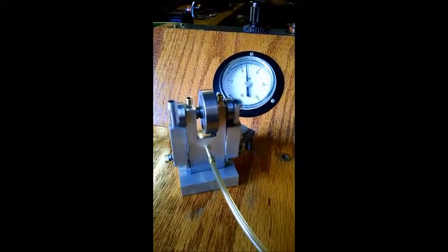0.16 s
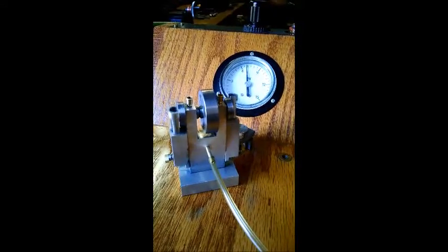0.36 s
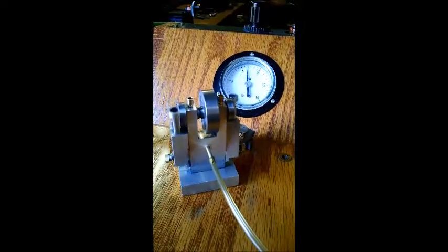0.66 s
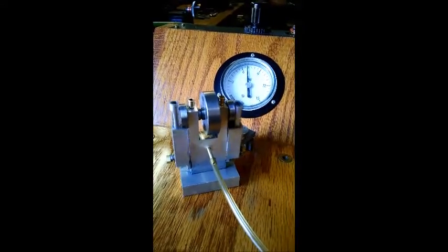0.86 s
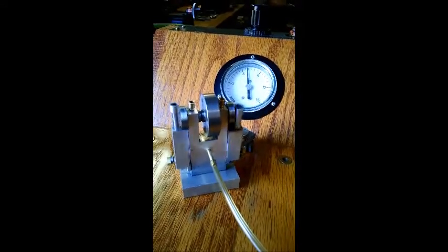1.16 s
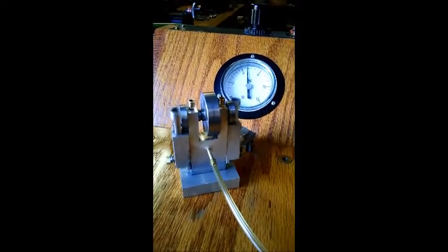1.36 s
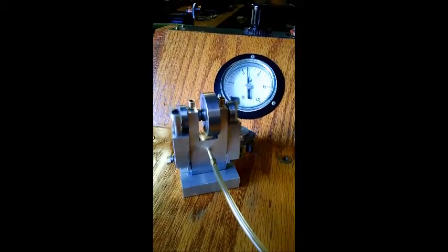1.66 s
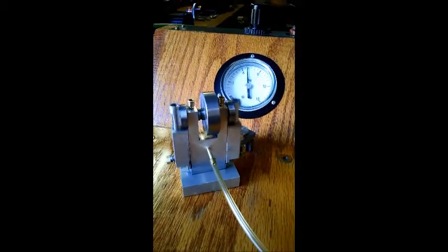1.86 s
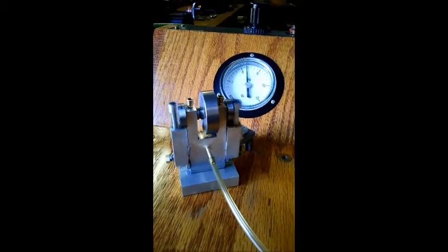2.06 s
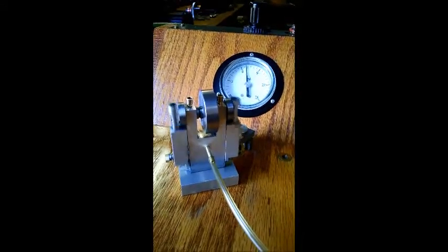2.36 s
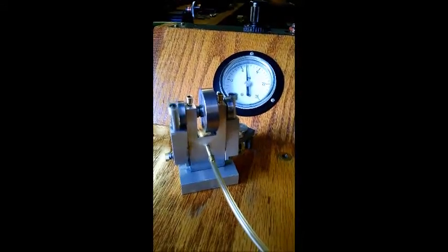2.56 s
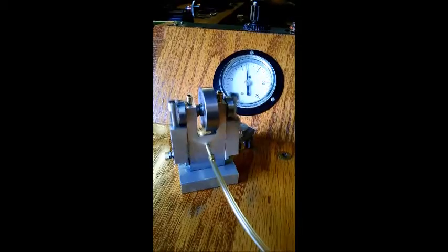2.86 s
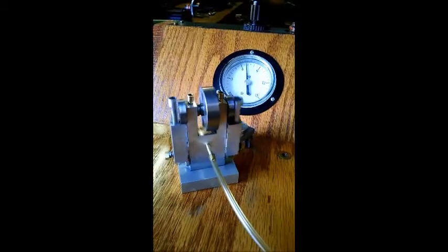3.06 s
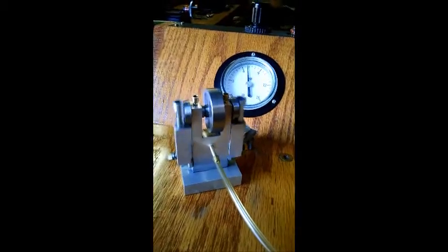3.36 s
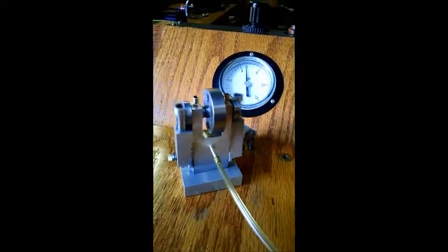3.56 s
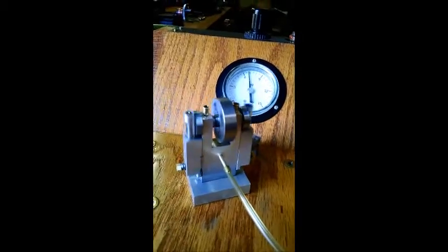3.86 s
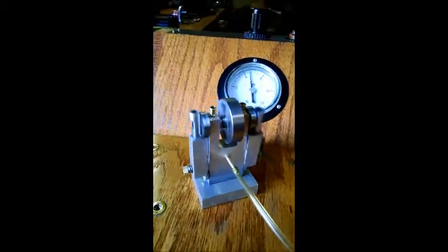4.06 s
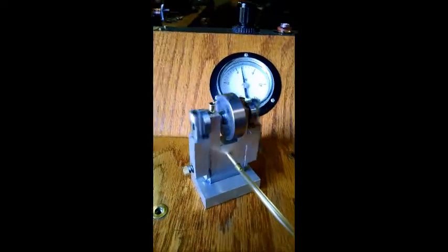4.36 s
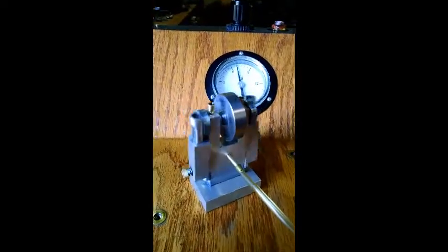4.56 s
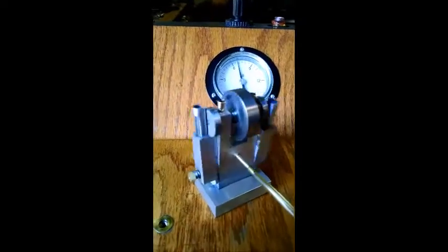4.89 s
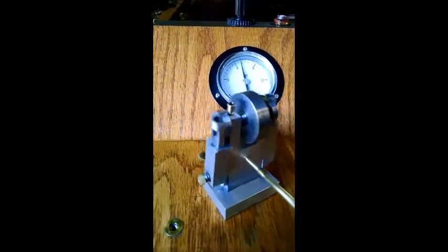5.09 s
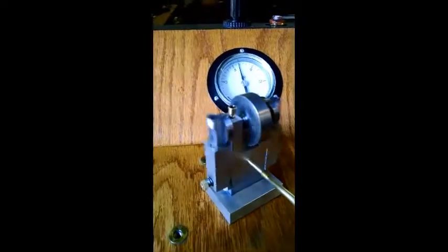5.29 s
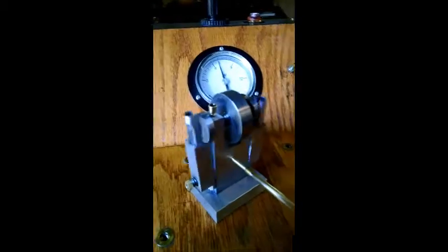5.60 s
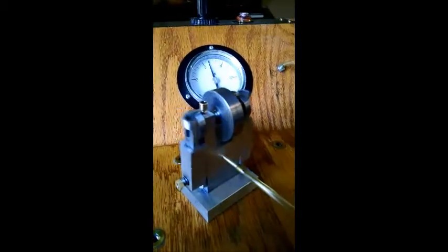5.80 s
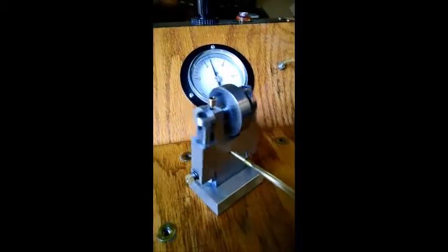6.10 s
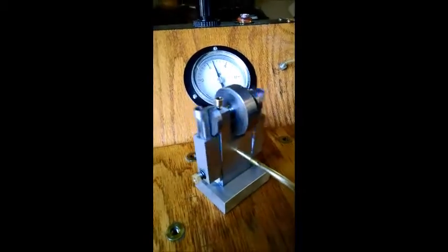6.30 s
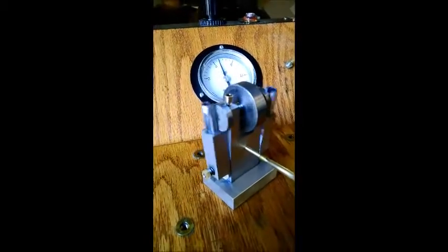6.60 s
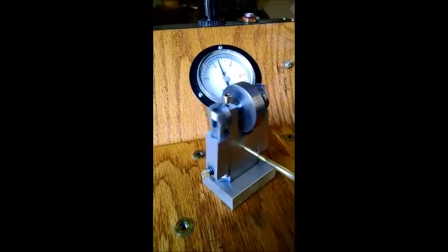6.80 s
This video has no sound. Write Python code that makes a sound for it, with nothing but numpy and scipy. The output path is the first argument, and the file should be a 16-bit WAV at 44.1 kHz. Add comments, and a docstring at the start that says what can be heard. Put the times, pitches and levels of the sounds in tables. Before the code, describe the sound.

A small compressed-air engine runs steadily on a wooden stand, about seven turns a second. Each turn gives two crisp puffs of bright, hissing air with a short spit, while the linkage knocks and thumps against metal and board. A thin airy leak fills the gaps. The handheld microphone moves closer midway, making the hiss brighter and the leak stronger; soft handling rustles come late over faint indoor room noise.

```python
"""A small compressed-air engine puffs at seven turns a second on a wooden stand, close to a hand-held phone.
Each turn lets out two main puffs of air, made of shaped noise: a broad hiss, a shrill jet and a short spit.
The linkage takes up its play with knocks and thumps, short blows that set the frame and board ringing.
Air leaks at the valve, most strongly between the puffs, as a band of noise that slides in pitch.
The phone moves closer in the second half; soft rustles, clicks, room noise and a faint hum lie below."""
import sys
import numpy as np
from scipy import signal
from scipy.fft import rfft, irfft
from scipy.io import wavfile
from scipy.ndimage import uniform_filter1d

SR = 44100
rng = np.random.default_rng(int(sys.argv[2]) if len(sys.argv) > 2 else 0)


def wav_out(sig):
    """Save sig, one row per channel (or a flat mono array), as 16-bit PCM at SR to the path in sys.argv[1]."""
    wavfile.write(sys.argv[1], SR, np.round(np.clip(np.atleast_2d(sig).T, -1, 1) * 32767).astype(np.int16))


N = 306054
TIME = np.arange(N) / SR  # s
FREQ = np.maximum(np.fft.rfftfreq(N, 1 / SR), 1)  # Hz

# no two turns let out the same air
# (port cracks open t/s, main puff relative level/dB, second puff relative level/dB, spit relative level/dB)
TURN_STRENGTHS = [(0.12, 2.0, 1.5, -3), (0.265, 2.5, 1.0, -3), (0.413, 0.5, 1.0, -5), (0.561, 1.0, 1.5, 0),
                  (0.705, 0.5, 1.0, -1), (0.85, 0.0, 1.0, -7), (0.991, 1.5, 0.5, -1),
                  (1.142, -1.0, 0.0, -9), (1.289, -1.0, -1.5, -3), (1.432, -1.5, -1.0, -2),
                  (1.579, -1.5, -1.5, -2), (1.723, 0.5, -1.5, 0), (1.869, -0.5, -1.5, -4),
                  (2.014, -0.5, -0.5, -9), (2.157, -0.5, -1.0, -5), (2.301, 0.5, 0.0, -2),
                  (2.441, 0.5, 0.0, -10), (2.59, -1.0, -1.0, -7), (2.734, -2.0, -0.5, -3),
                  (2.877, 1.0, -2.0, -4), (3.019, -0.5, -1.5, -2), (3.165, -1.0, -1.0, -3),
                  (3.305, -2.0, -1.5, 1), (3.446, -2.0, -1.0, -2), (3.589, -1.5, -1.0, 2),
                  (3.728, -2.0, 1.5, 0), (3.875, -1.0, 0.5, -1), (4.018, 0.5, 2.5, -3),
                  (4.158, -0.5, 2.5, -2), (4.298, -1.0, 0.0, -2), (4.443, -1.5, -0.5, -2),
                  (4.585, -0.5, -0.5, 2), (4.728, 1.0, 0.0, -1), (4.871, -1.0, -1.5, 4),
                  (5.013, -0.5, -2.0, -1), (5.156, 1.0, 0.0, 6), (5.3, -1.0, -0.5, 4), (5.441, 0.5, 0.5, 7),
                  (5.582, -1.0, 0.5, 6), (5.723, 0.0, -1.0, 2), (5.863, -1.0, -0.5, -5),
                  (6.008, 0.5, 2.5, 2), (6.149, 1.0, 1.0, 6), (6.293, 0.5, 1.0, 3), (6.436, -1.0, -0.5, -2),
                  (6.578, -0.5, -0.5, 2), (6.718, 0.0, -0.5, 4), (6.862, 0.5, -1.0, -11)]


def exhaust(angle, near, jet_hz, linger_s=0.018, linger_db=-13):
    """Each port opening lets out a puff; the shrill jet grows faster with the flow than the broad hiss."""
    # air let out during a turn: (crank angle/degrees, relative level/dB, opening/degrees, closing/degrees)
    openings = [(-58, -16, 4, 4.7), (-1, 1.5, 14.3, 17.5), (86, -4, 31.6, 23.2), (115, -15, 4, 3),
                (151.5, -15, 15, 9.6)]
    # broad hiss: (f/Hz, relative level per Hz from afar/dB, relative level per Hz from near/dB)
    hiss_colour = [(680, -18.5, -2), (1520, -18, -13.5), (2480, -15, -4.5), (3130, -11, -10),
                   (3530, -18, -4.5), (4280, -4, -7.5), (5200, 3, -2), (6400, 1.5, 1), (7720, 4, 8),
                   (10150, -3, 3), (11600, -2.5, -9), (15800, 0, 5)]
    # shrill jet: (f/Hz, relative level per Hz from afar/dB, relative level per Hz from near/dB)
    jet_colour = [(2960, -23, -17.5), (4250, -35, -26.5), (5120, -10.5, 3), (6400, -18, -37),
                  (10100, -12.5, 0.5), (12600, -6, -18), (13170, 0, -1.5), (14100, 6, 7), (14500, -2.5, -2),
                  (16000, 11, 8), (17000, -0.5, -3)]

    power = 0
    strength = pressure()
    for degrees, db, opening, closing in openings:
        since = (angle - degrees + 180) % 360 - 180  # degrees, wrapped to the nearest opening
        puff = undb(db) * strength * swell(since, opening, closing)
        power = power + puff ** 2
    # turbulence makes the outflow flutter within each puff
    flutter = unit(uniform_filter1d(rng.standard_normal(N), size=110))
    power = power * undb(1 * flutter) ** 2  # 1 dB rms
    # the room holds each puff for a moment
    keep = np.exp(-1 / (linger_s * SR))
    lingering = signal.lfilter([1 - keep], [1, -keep], power)
    flow = np.sqrt(power + undb(linger_db) ** 2 * lingering)

    hiss_noise = beamed(hiss_colour, near, ripple(depth_db=1.8, span_s=0.0053))
    hiss = undb(-28.0) * flow ** 0.51 * hiss_noise
    jet_noise = beamed(jet_colour, near, ripple(depth_db=1.8, span_s=0.007))
    jet = undb(-22.0) * flow ** 1.05 * jet_noise
    # only the shrill top of the jet changes pitch with the angle to the phone
    shrill = irfft(rfft(jet) * (FREQ > 12000), N)
    # nearer its axis, where it sounds highest, the jet's upper hiss also fills the gaps
    spray_noise = air_noise(np.exp(-((FREQ - 12500) / 2500) ** 2))
    spray = undb(-42.0) * jet_hz / 350 * spray_noise
    # on the axis the shrill top is louder too
    top = glide(shrill, jet_hz) * undb(4.7 * jet_hz / 350)
    return hiss + jet - shrill + top + spray


def pressure(second_puff_s=0.04):
    """Strength of the air behind each stroke, passing from one puff to the next."""
    s, main_db, second_db, _ = np.transpose(TURN_STRENGTHS)
    times = np.c_[s, s + second_puff_s].ravel()
    levels_db = np.c_[main_db, second_db].ravel()
    return undb(np.interp(TIME, times, levels_db))


def swell(x, rise, fall):
    """A puff-like bump: round-topped at x = 0, with flanks that become exponential."""
    return np.exp(.5 - np.sqrt(0.17 + (x / np.where(x < 0, rise, fall)) ** 2))


def ripple(depth_db, span_s):
    """Echoes from the stand comb a spectrum with fixed narrow peaks and dips."""
    size = max(int(span_s * SR), 8)
    echoes = rng.standard_normal(size) * np.linspace(0, 1, size)
    return undb(depth_db * unit(rfft(echoes, N).real))


def beamed(table, near, comb):
    """Noise whose colour passes from the far to the near spectrum as the phone moves."""
    hz, *spectra = np.transpose(table)
    far, close = (air_noise(comb * undb(over_freq(np.transpose([hz, db])))) for db in spectra)
    near = np.clip(near, 0, 1)
    return np.sqrt(1 - near) * far + np.sqrt(near) * close


def glide(x, offset_hz):
    """Slide a band of noise up or down by a changing number of Hz."""
    turning = np.exp(2j * np.pi * np.cumsum(offset_hz) / SR)
    return (signal.hilbert(x) * turning).real


def air_noise(gain, direct=1):
    """Coloured noise at both ports: the left is delayed and partly unrelated, more so the less direct it is."""
    # how far the left microphone port lags the right: (f/Hz, lag/radians)
    port_lag = [(130, -2.8), (230, -.4), (1500, 0), (2000, .5), (2330, 3.08), (2680, 3.2), (3000, 4.3),
                (3500, 6.2), (4200, 6.3), (4500, 9.35), (5250, 9.5), (6000, 10.5), (7000, 12.9),
                (7700, 16.5), (9300, 19), (10150, 21.9), (10700, 22.4), (11400, 24.5), (12600, 26.6),
                (13100, 29.5), (14200, 31.4), (15200, 35.4)]
    # likeness of direct air noise at the two ports: (f/Hz, likeness/0-1)
    likeness = [(300, 0.64), (1500, .9), (2200, 0.7), (2400, .98), (2530, 1), (2680, .97), (3050, 0.45),
                (3800, 0.9), (4300, .5), (4650, .995), (5250, 0.995), (5900, 0.45), (8000, .35),
                (8900, 0.8), (9700, .7), (10300, 0.96), (11200, 0.45), (11900, .75), (12750, .25),
                (13900, .87), (14750, .5), (15300, 0.7)]
    right, other = rfft(rng.standard_normal((2, N)))
    alike = np.clip(over_freq(likeness) * direct, 0, 1)
    lagged = right * np.exp(-1j * over_freq(port_lag))
    left = alike * lagged + np.sqrt(1 - alike ** 2) * other
    return unit(irfft(np.array([left, right]) * gain, N))


def spit(rise_s=0.0016, fall_s=0.0026, centre_hz=5500, octaves=0.33):
    """The exhaust port cracks open with a short, sharp spit of noise, only partly alike at the two ports."""
    t = np.arange(-SR // 100, SR // 40) / SR
    envelope = np.zeros(N)
    for when, _, _, db in TURN_STRENGTHS:
        add(envelope, when + t[0], undb(db) * swell(t, rise_s, fall_s))
    band = 1 / (1 + (np.log2(FREQ / centre_hz) / octaves) ** 2)
    return undb(-38.5) * envelope * air_noise(band, direct=0.65)


def leak(angle, leak_db, leak_hz, width_hz=520, depth=0.95, swing_hz=110):
    """Air seeps all the time, and sings in a narrow gap while the valve is shut, rising as pressure builds."""
    # steady seepage: (f/Hz, relative level per Hz/dB)
    seep_colour = [(300, 6), (1000, -1), (2200, 4), (3200, 11), (3700, 3), (4400, 2), (5100, -8),
                   (6200, -9), (8000, -28), (10000, 14.5), (11500, 8.5), (12700, -5), (14200, 13),
                   (16000, 10)]
    shut = 1 + depth * np.cos(np.radians(angle - 245))
    centre = np.mean(leak_hz)
    pitch = leak_hz + swing_hz * np.cos(np.radians(angle - 320))
    band = air_noise(1 / (1 + ((FREQ - centre) / (2 * width_hz)) ** 2) ** 3)
    singing = undb(-46.5 + leak_db) * shut * glide(band, pitch - centre)
    seep = undb(-41.0 + 0.22 * leak_db) * air_noise(undb(over_freq(seep_colour)))
    return singing + seep


def linkage(angle, near, jitter_s=0.00019):
    """Light knocks repeat with the crank; the loosest joint thumps once a turn, followed by a click."""
    # play taken up during a turn: (crank angle/degrees, relative level/dB, strongest f/Hz, breadth/octaves,
    # push time/s, scatter of level/dB, level gained up close/dB)
    knock_table = [(-100, -16.5, 400, 1.6, 0.0054, 4, -3), (-57.5, -8, 490, 0.76, 0.003, 1.5, 0),
                   (-56, -5, 1138, 0.84, 0.0035, 0.9, 3), (-42, -1, 408, 0.87, 0.0064, 0.5, 2.5),
                   (-17, -12, 447, 0.83, 0.01, 3, 2), (0.5, -5, 1353, 0.55, 0.0071, 1.5, 0),
                   (1.5, -14, 1886, 0.13, 0.0089, -1, 1), (74, -6.5, 1138, 1.1, 0.0043, 2.2, -2.5),
                   (77, -9.5, 360, 0.34, 0.0056, 2.5, -1)]
    # return-stroke thumps, harder or softer as the play drifts: (t/s, relative level/dB)
    thump_table = [(0.0217, -1.5), (0.1691, -4.5), (0.3166, -1.5), (0.4631, 0), (0.609, 1.5), (0.757, -2),
                   (0.9023, 0), (1.046, 1.5), (1.1925, -2), (1.3393, -2), (1.484, -6), (1.6293, 1.5),
                   (1.7741, -2), (1.917, -4), (2.0636, -4.5), (2.2061, -3.5), (2.3514, -9), (2.496, -2),
                   (2.6408, -1), (2.7839, 0.5), (2.927, 0), (3.0712, 0.5), (3.2138, 3), (3.356, -0.5),
                   (3.4988, 2), (3.6408, -0.5), (3.7815, -3), (3.925, 0), (4.0666, 1), (4.208, -0.5),
                   (4.35, -12), (4.4928, -2), (4.6363, -1.5), (4.777, -4.5), (4.923, 2), (5.0643, 3),
                   (5.2055, 0.5), (5.3492, 2), (5.491, 5.5), (5.6339, 4.5), (5.774, 3), (5.915, 3),
                   (6.0574, 4.5), (6.201, 4), (6.3427, 0.5), (6.4853, 3.5), (6.6255, 4), (6.769, 0),
                   (6.9112, 3.5)]

    out = np.zeros(N)
    for degrees, db, blow_hz, octaves, push_s, scatter_db, near_db in knock_table:
        for when in passes(angle, degrees):
            late, strength = rng.standard_normal(2)
            level_db = db + scatter_db * strength + near_db * np.interp(when, TIME, near)
            add(out, when + jitter_s * late, undb(level_db) * blow(blow_hz, octaves, push_s))
    for when, db in thump_table:
        thump = blow(blow_hz=381, octaves=0.83, push_s=0.0051)
        add(out, when, undb(3 + db) * thump)
        click = blow(blow_hz=1262, octaves=0.82, push_s=0.0059)
        add(out, when + 0.00224, undb(-12 + 0.17 * db) * click)
    # the heavy frame radiates little treble, and less above the bass towards the phone's nearer position
    body = rfft(out) / (1 + (FREQ / 2200) ** 24)
    bass = body / (1 + (FREQ / 650) ** 4)
    upper = irfft(body - bass, N) * undb(-3.8 * near)
    right = undb(-37.5) * (irfft(bass, N) + upper)
    # the left port picks up less of the board's bass, and a little sooner
    left_db = over_freq([(200, -19.5), (330, -4.0), (450, -0.5), (580, -6.0), (800, 2.5), (2000, -0.5)])
    lead = over_freq([(150, 0.086), (450, 0.99), (1000, 0.2), (1500, 0.68), (2000, -1.1)])  # radians
    left = irfft(rfft(right) * undb(left_db) * np.exp(1j * lead), N)
    return np.array([left, right])


def blow(blow_hz, octaves, push_s, push_db=7, crack_db=-13, contact_s=0.00086):
    """One blow shoves the stand for a moment, then the modes in its range ring on."""
    # ringing of the board (low) and engine frame (high): (f/Hz, relative level/dB, time to fall 60 dB/s)
    ringing_modes = [(196, -23, 0.5), (239.5, -7.5, 0.56), (322.6, -4.5, 0.19), (345.5, -4.5, 0.08),
                     (416.6, -1, 0.073), (439, -1.5, 0.13), (518.5, -4, 0.08), (592, 3.5, 0.02),
                     (798, 6, 0.037), (954.5, 6.5, 0.036), (1037, 8, 0.03), (1257, 5.5, 0.036),
                     (1350, 4, 0.053), (1890, -2.5, 0.054)]
    hz, mode_db, t60 = np.transpose(ringing_modes)
    t = np.arange(SR // 3) / SR
    rings = np.sin(2 * np.pi * hz[:, None] * t) * np.exp(-np.log(1000) * t / t60[:, None])
    # from blow to blow the modes differ by about 1 dB
    scatter_db = 1 * rng.standard_normal(len(hz))
    in_range = 1 / (1 + (np.log2(hz / blow_hz) / octaves) ** 2)
    weight = undb(mode_db + scatter_db) * in_range
    push = undb(push_db) * np.sin(2 * np.pi * blow_hz * t) * np.sin(np.pi * np.minimum(t / push_s, 1))
    crack = undb(crack_db) * rng.standard_normal(len(t)) * np.exp(-t / 0.0022)
    # the oil film softens the first contact
    return push + (weight @ rings + crack) * (1 - np.exp(-t / contact_s))


def crank(start_turns=-0.8):
    """Crank angle in degrees, about zero at the main puff: the running sum of the flywheel's speed."""
    # flywheel speed, wandering with the air supply: (t/s, speed/turns per s)
    flywheel_speed = [(0.0, 6.839), (0.5, 6.763), (0.8, 6.915), (1.1, 6.863), (2.65, 6.954), (4.0, 7.062),
                      (4.9, 6.965), (5.2, 7.061), (6.94, 7.022)]
    speed = np.interp(TIME, *np.transpose(flywheel_speed))
    return 360 * (start_turns + np.cumsum(speed) / SR)


def passes(angle, degrees):
    """The times at which the crank passes a given angle, once a turn."""
    marks = degrees + 360 * np.arange(-1, angle[-1] // 360 + 2)
    inside = (marks > angle[0]) & (marks < angle[-1])
    return np.interp(marks[inside], angle, TIME)


def room(x, wet_db, t60_s, low_hz=420):
    """A short diffuse tail, different at each port; the bass is left to the board's own ringing."""
    t = np.arange(SR // 2) / SR
    tail = rng.standard_normal((2, len(t))) * np.exp(-np.log(1000) * t / t60_s) * (t > .004)
    tail /= np.sqrt(np.sum(tail ** 2, axis=1, keepdims=True))
    tail = signal.sosfilt(signal.butter(2, low_hz, "high", fs=SR, output="sos"), tail)
    return x + undb(wet_db) * signal.fftconvolve(x, tail, axes=1)[:, :N]


def handling():
    """Soft rustles of grainy noise, and stray clicks that are fast-fading tones."""
    # brief rustles: (t/s, level/dB, rise/s, fall/s)
    rustle_table = [(5.262, -35.5, 0.0096, 0.018), (5.815, -40, 0.016, 0.019), (6.048, -30.5, 0.044, 0.05)]
    # their colour: (f/Hz, relative level per Hz/dB)
    rustle_colour = [(200, -21), (600, -5.5), (1800, -4.5), (3000, -6), (4300, -3), (5200, -2), (7000, -3),
                     (10000, -2.5), (12000, -2.5), (16000, -27)]
    # stray clicks: (t/s, level/dB, f/Hz, decay/s)
    click_table = [(.152, -20, 716, 0.001), (1.828, -30, 440, 0.0046), (5.26, -34, 1400, .003),
                   (5.283, -34, 545, .007)]
    envelope = sum(undb(db) * swell(TIME - s, rise, fall) for s, db, rise, fall in rustle_table)
    grain = unit(uniform_filter1d(rng.standard_normal(N), size=150))
    noise = air_noise(undb(over_freq(rustle_colour)), direct=0.84)
    out = envelope * undb(1.5 * grain) * noise  # grain of 1.5 dB rms
    for s, db, hz, decay in click_table:
        t = np.maximum(TIME - s, 0)
        out = out + undb(db) * np.sin(2 * np.pi * hz * t) * np.exp(-np.minimum(t / decay, 50))
    return out


def background():
    """Low room noise, stronger at the right port, with a faint mains hum."""
    # room noise: (f/Hz, relative level per Hz/dB)
    room_colour = [(20, 8.5), (35, -8), (60, 8), (85, 1), (120, 4.5), (160, -8), (240, 4), (330, 1),
                   (450, 5.5), (600, -2), (1300, -3.5), (1900, -17.5), (2400, -52), (4000, -101)]
    colour = undb(over_freq(room_colour))
    # the same noise at both ports, with its lowest bass reduced
    shared = unit(irfft(rfft(rng.standard_normal(N)) * colour * FREQ / (FREQ + 200), N))
    rumble = air_noise(colour / (1 + FREQ / 220))
    hum = undb(-64) * np.sin(2 * np.pi * 60 * TIME)
    port_gain = undb([[-3.5], [0]])  # left, right
    return (undb(-47.5) * shared + undb(-46.5) * rumble + hum) * port_gain


def undb(db):
    """Decibels to gain."""
    return 10 ** (np.asarray(db) / 20)


def unit(x):
    """Scale to rms 1."""
    return x / np.sqrt(np.mean(x ** 2))


def over_freq(points):
    """Join (f/Hz, value) points on a log-frequency axis."""
    hz, value = np.transpose(points)
    return np.interp(np.log(FREQ), np.log(hz), value)


def add(out, when, sound):
    """Mix a sound in from a given time in seconds."""
    i = int(np.clip(when * SR, 0, N))
    out[i:i + len(sound)] += sound[:N - i]


def scene():
    """The crank angle times the puffs and light knocks; the phone's nearness colours the engine."""
    # as the phone moves round the engine: (t/s, nearness/0-1, jet shift/Hz)
    phone_path = [(0, 0, -1), (2, 0.02, 2.5), (3.498, 0.06, 45.5), (4.201, 0.27, 350), (5, 0.76, 154.5),
                  (5.7, 0.77, 81), (6.299, 0.6, 38), (6.94, 0.93, 36.5)]
    angle = crank()
    s, *columns = np.transpose(phone_path)
    near, jet_hz = (np.interp(TIME, s, column) for column in columns)
    puffs = exhaust(angle, near, jet_hz) + spit()
    # the leak is louder and higher from near
    valve = leak(angle, leak_db=-4 + 9 * near, leak_hz=8830 + 258.5 * near)
    knocks = room(linkage(angle, near), wet_db=-17.5, t60_s=0.4)
    return puffs + valve + knocks + handling() + background()


def record(dry):
    """The phone cuts the top steeply, above 15420 Hz."""
    return signal.sosfilt(signal.ellip(10, .2, 80, 15420, fs=SR, output="sos"), dry)


dry = scene()
out = record(dry)
wav_out(out)
```